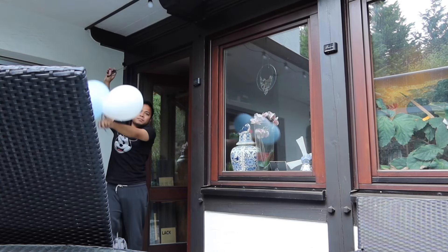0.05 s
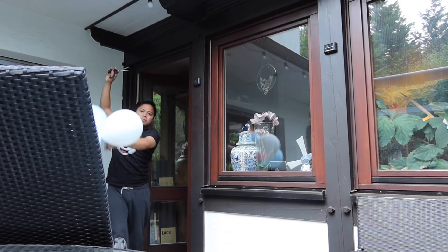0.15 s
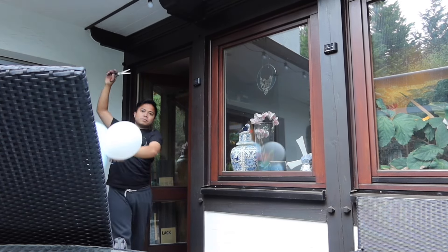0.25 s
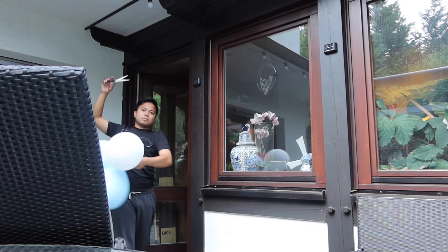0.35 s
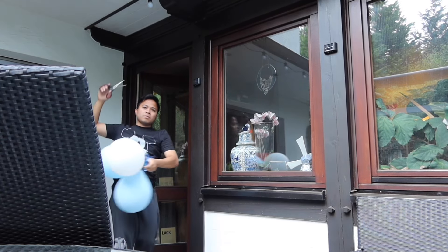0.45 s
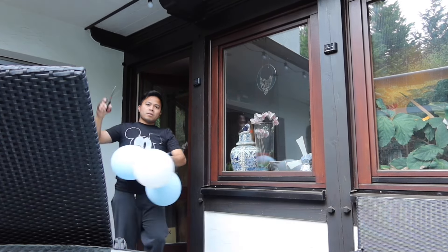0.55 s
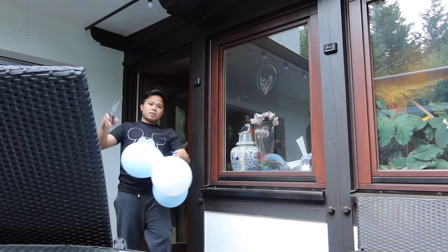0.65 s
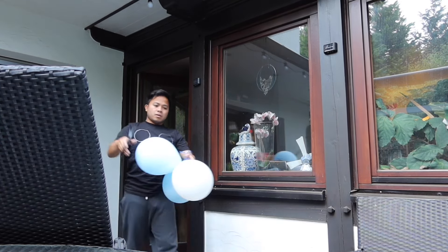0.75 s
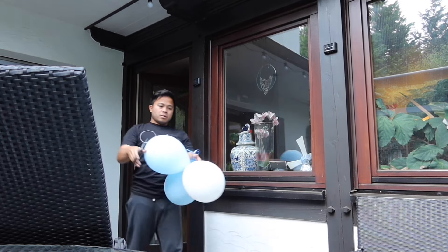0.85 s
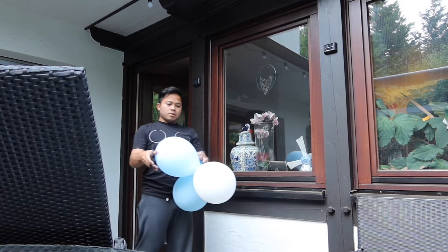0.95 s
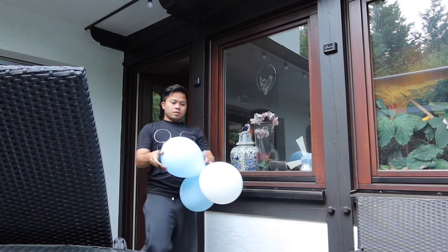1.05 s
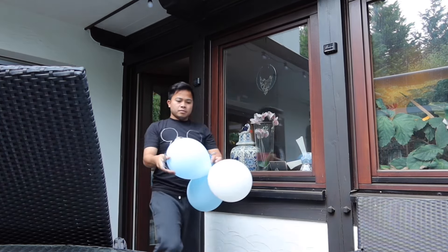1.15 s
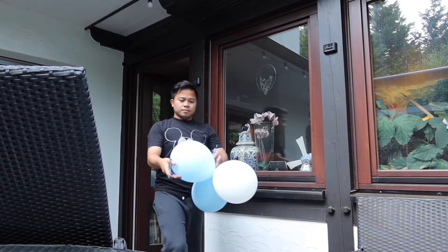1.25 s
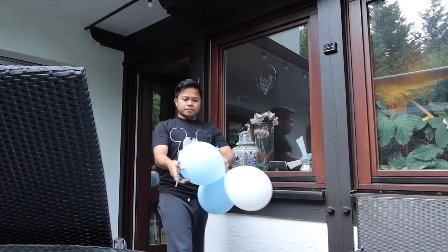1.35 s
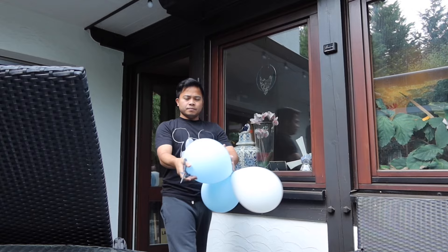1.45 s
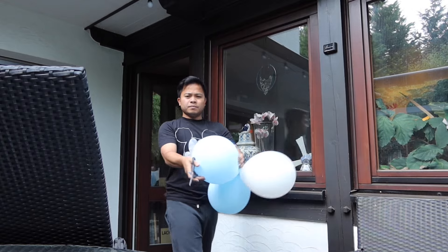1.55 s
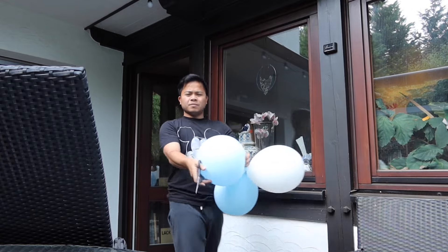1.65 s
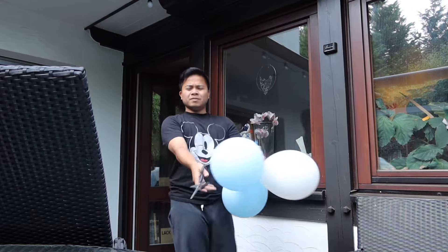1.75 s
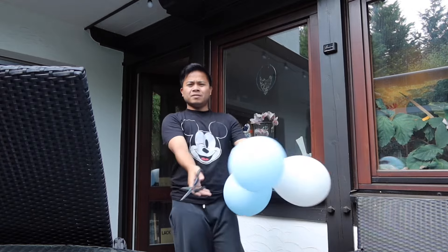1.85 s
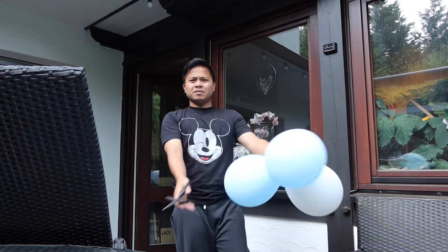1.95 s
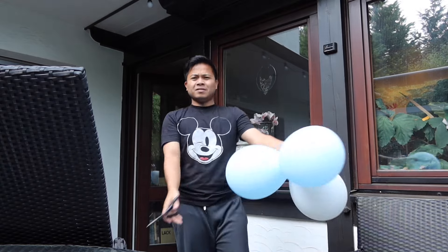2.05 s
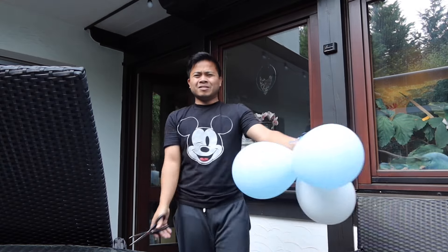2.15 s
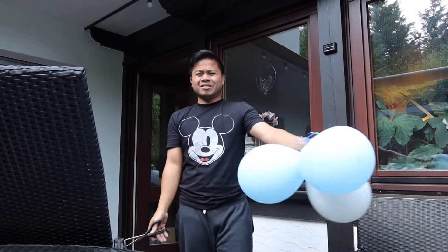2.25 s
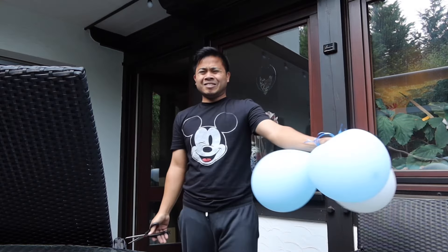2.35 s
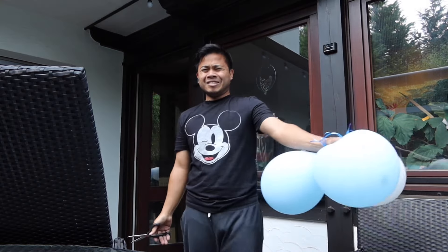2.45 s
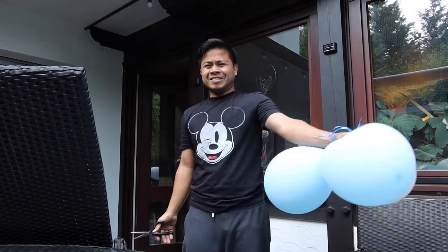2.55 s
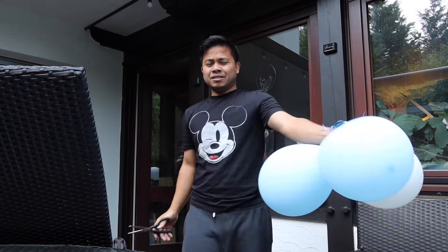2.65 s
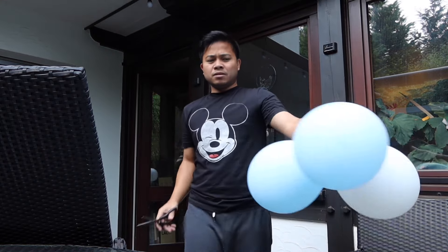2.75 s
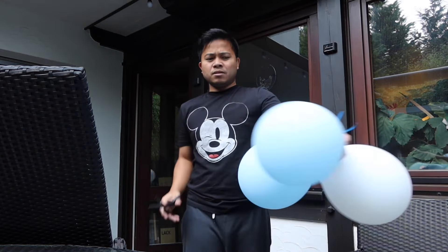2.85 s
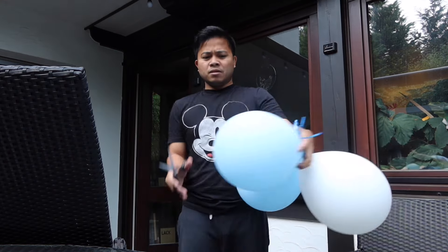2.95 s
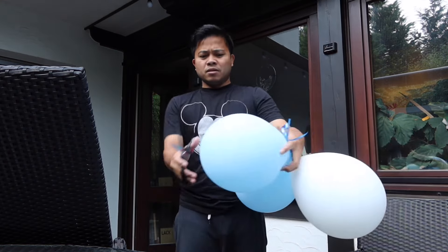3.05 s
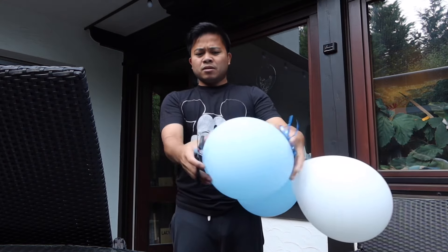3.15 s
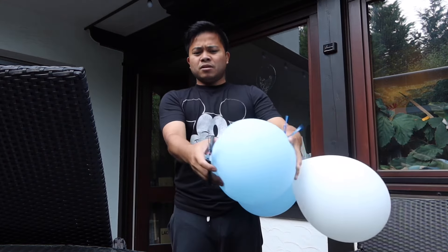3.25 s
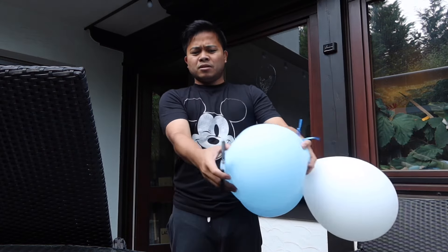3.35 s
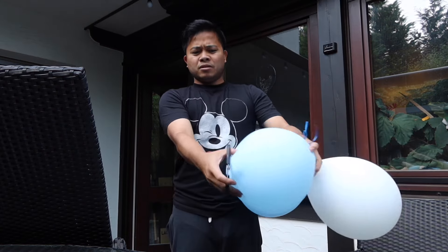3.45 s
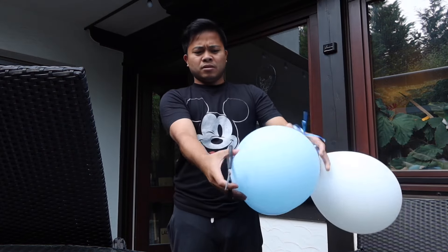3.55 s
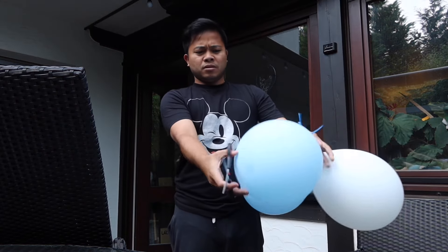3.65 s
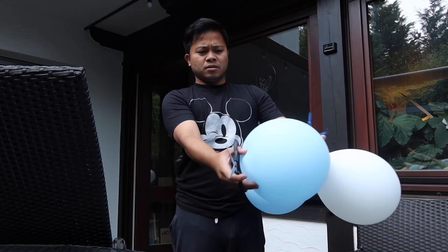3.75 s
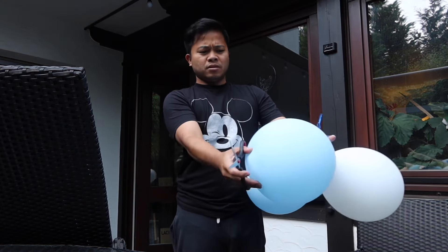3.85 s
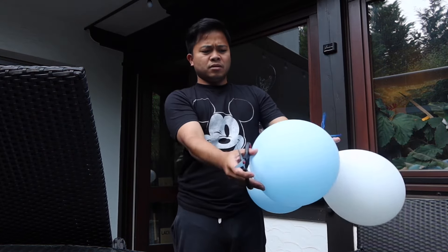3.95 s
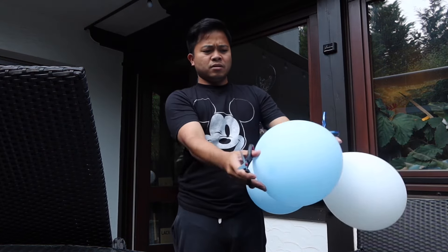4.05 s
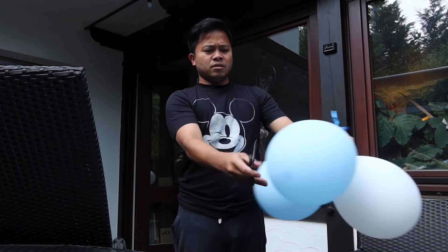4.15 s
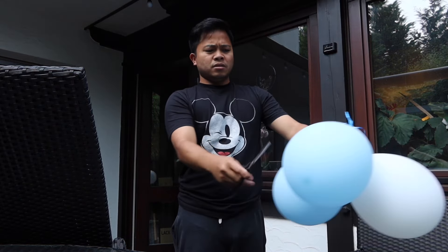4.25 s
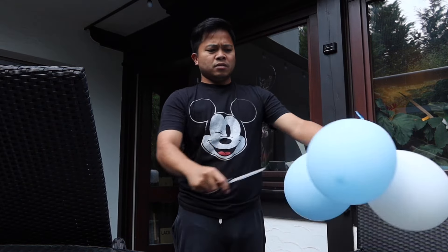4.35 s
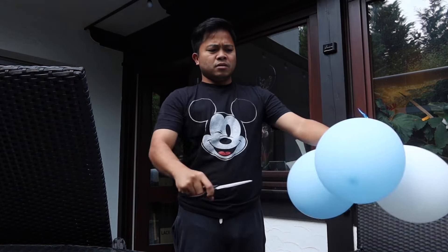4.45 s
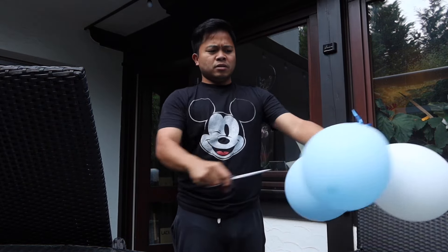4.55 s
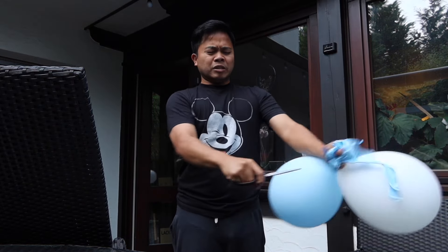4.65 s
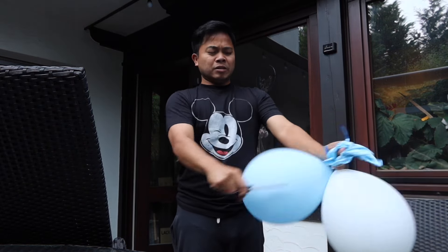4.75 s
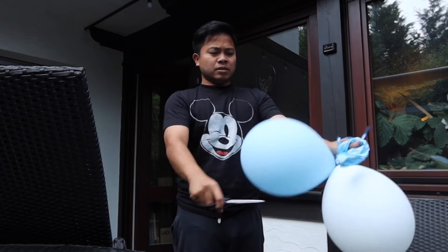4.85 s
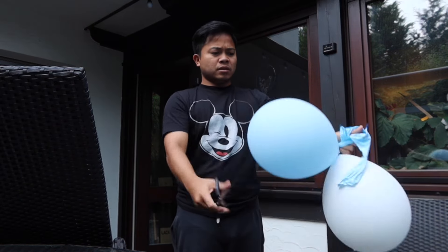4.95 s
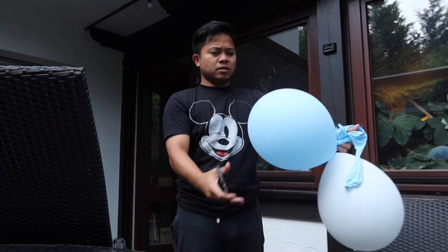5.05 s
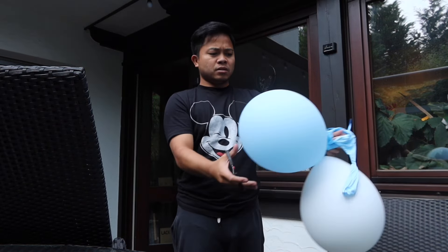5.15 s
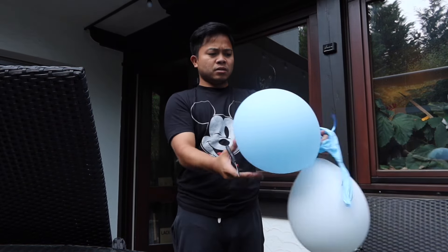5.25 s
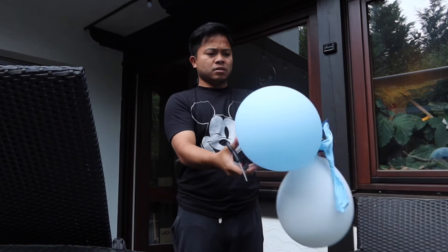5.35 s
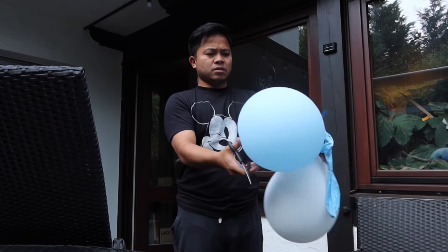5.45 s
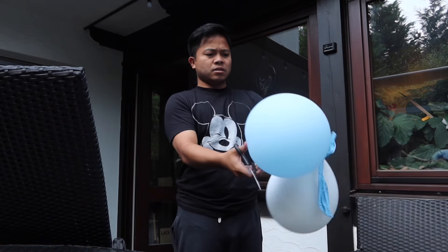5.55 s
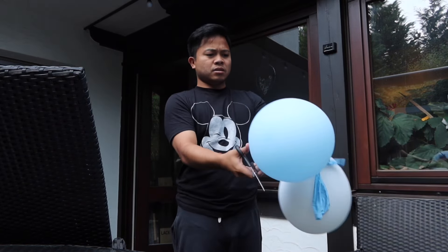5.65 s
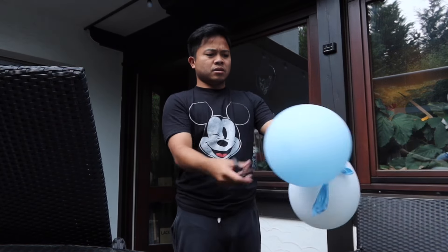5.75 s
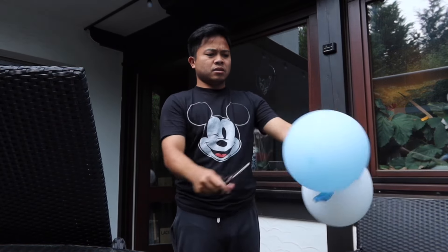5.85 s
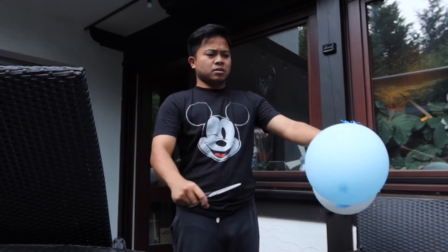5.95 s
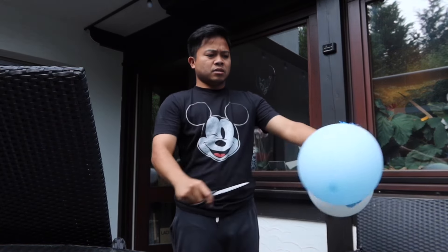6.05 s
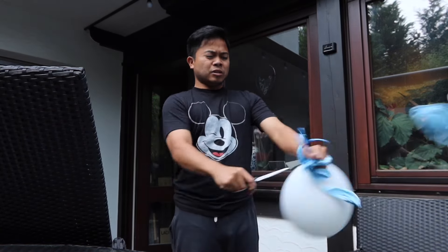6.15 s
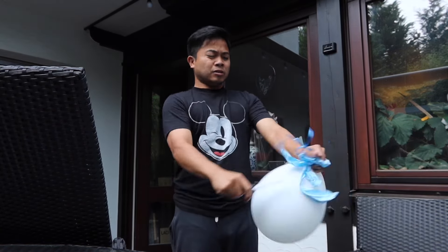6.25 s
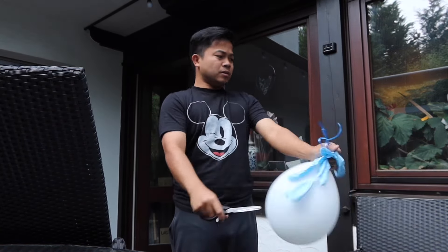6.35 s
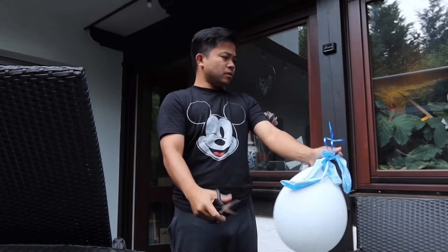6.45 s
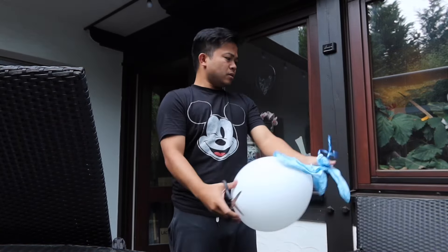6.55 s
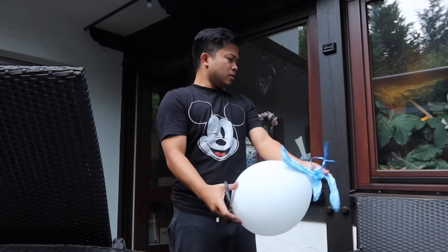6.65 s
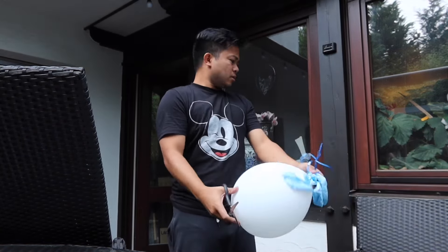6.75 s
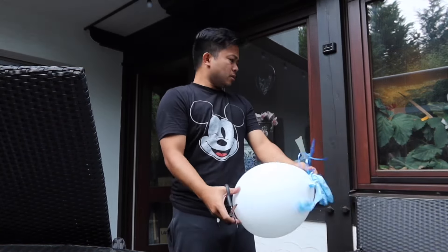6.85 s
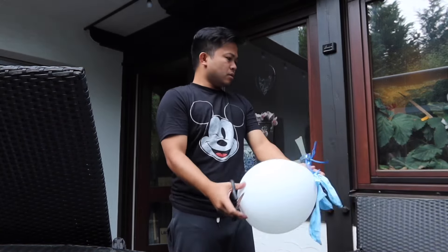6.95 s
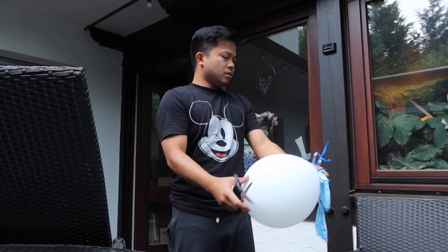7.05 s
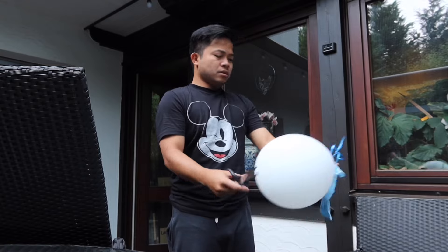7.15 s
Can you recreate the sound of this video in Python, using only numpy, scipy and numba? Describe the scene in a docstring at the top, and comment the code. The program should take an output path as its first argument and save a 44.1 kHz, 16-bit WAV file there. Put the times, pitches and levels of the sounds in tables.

```python
"""A low outdoor murmur runs throughout, under fingers rubbing and squeezing latex balloons on a porch.
Dense micro-slips make the rubbing; single hard slips crack and set the balloon's skin and air ringing.
Soft bumps thud, squeaks glide, creaks run slip after slip and palms hiss over the skin.
Two balloons are burst with scissors: filtered clicks, short swings, a wide dull noise and a yard echo.
They overload a small stereo recorder, whose limiter ducks and then lets the echo swell back."""
import sys
import numpy as np
from scipy import signal
from scipy.fft import rfft, irfft, next_fast_len
from scipy.io import wavfile
from scipy.ndimage import uniform_filter1d, minimum_filter1d
from numba import njit

SR = 44100
rng = np.random.default_rng(int(sys.argv[2]) if len(sys.argv) > 2 else 0)


def generate_wav(signal):
    """Clip the signal to [-1, 1] and save it as 16-bit WAV at the path in sys.argv[1]."""
    frames = np.transpose(np.atleast_2d(signal))
    scaled = np.clip(frames, -1, 1) * 32767
    pcm = np.round(scaled).astype(np.int16)
    wavfile.write(sys.argv[1], SR, pcm)


N = 317079
TIME = np.arange(N) / SR
SIZE = next_fast_len(N + SR)


def from_db(db):
    """Decibels to gain."""
    return 10 ** (np.asarray(db) / 20)


def rms_one(x):
    """Scale to unit rms."""
    return x / np.sqrt(np.mean(x ** 2) + 1e-20)


def at_hz(points, hz):
    """Read a table's second column against its first, on a log-frequency axis."""
    points = np.array(points)
    return np.interp(np.log(hz + 1), np.log(points[:, 0]), points[:, 1])


def high_pass(x, hz):
    """Take away the bass below hz, at 12 dB per octave."""
    return signal.sosfilt(signal.butter(2, hz, "high", fs=SR, output="sos"), x)


def colour(x, spectrum):
    """Causal (minimum-phase) filter with the given dB spectrum, so nothing sounds before a click."""
    size = 4096
    log_gain = np.log(from_db(at_hz(spectrum, np.fft.rfftfreq(size, 1 / SR))))
    cepstrum = irfft(log_gain)
    # folding the cepstrum forward gives minimum phase
    cepstrum[1:size // 2] *= 2
    cepstrum[size // 2 + 1:] = 0
    response = irfft(np.exp(rfft(cepstrum)))
    response = response.reshape((1,) * (x.ndim - 1) + (-1,))
    return signal.fftconvolve(x, response, axes=-1)[..., :N]


def clicks_at(times, sizes):
    """A train of single samples."""
    out = np.zeros(N)
    np.add.at(out, np.minimum((np.asarray(times) * SR).astype(int), N - 1), sizes)
    return out


def ring(clicks, hz, t60):
    """A two-pole resonator: a unit click sets a sine ringing that falls 60 dB in t60 seconds."""
    r, w = from_db(-60 / (t60 * SR)), 2 * np.pi * hz / SR
    return signal.lfilter([0, np.sin(w)], [1, -2 * r * np.cos(w), r * r], clicks + 1e-18)


@njit
def bending_ring(x, hz, width_hz, sr):
    """One resonance whose centre moves sample by sample."""
    out, r = np.zeros(len(x)), np.exp(-np.pi * width_hz / sr)
    for i in range(2, len(x)):
        drive = (1 - r * r) / 2 * (x[i] - x[i - 2])
        out[i] = drive + 2 * r * np.cos(2 * np.pi * hz[i] / sr) * out[i - 1] - r * r * out[i - 2]
    return out


def struck(notes, t60):
    """Damped sines, one for each (t/s, level/dB, f/Hz)."""
    out, t = np.zeros(N + SR), np.arange(int(min(2 * t60, 1) * SR)) / SR
    for s, db, hz in notes:
        out[int(s * SR):][:len(t)] -= from_db(db - 60 * t / t60) * np.sin(2 * np.pi * hz * t)
    return out[:N]


def closeness(hz, pitch, octaves, least):
    """Share of a touch that reaches a mode: most near the pitch the grip leaves free."""
    return np.maximum(np.exp(-(np.log2(hz / pitch) / octaves) ** 2), least)


# how alike reflections are left and right: [f/Hz, likeness 0-1]
REFLECTION_LIKENESS = [(100, 1), (500, 0.98), (2000, 1), (5000, 0.99)]


def echoes(x, t60_table, build_s):
    """Diffuse stereo reflections: noise whose octave bands die at their own rates; energy 1 per channel."""
    t = np.arange(SR) / SR
    tail = np.zeros((2, SR))
    # two takes of each noise alternate, so neighbouring bands are unrelated
    shared, own = rng.standard_normal((2, SR)), rng.standard_normal((2, 2, SR))
    for k, low in enumerate(40 * 2. ** np.arange(9)):
        centre = low * np.sqrt(2)
        alike = np.clip(at_hz(REFLECTION_LIKENESS, centre), 0, 1)
        band = signal.butter(2, [low, min(2 * low, .45 * SR)], "band", fs=SR, output="sos")
        noise = signal.sosfilt(band, np.sqrt(alike) * shared[k % 2] + np.sqrt(1 - alike) * own[k % 2])
        tail += noise * from_db(-60 * t / at_hz(t60_table, centre))
    tail *= 1 - np.exp(-t / build_s)
    tail /= np.sqrt(np.sum(tail ** 2) / 2)
    return signal.fftconvolve(x[None], tail, axes=-1)[:, :N]


# spectrum of the outdoor murmur: [f/Hz, relative level/dB per Hz]
GARDEN_SPECTRUM = [(20, -29), (50, 9.5), (100, 4), (250, 0.5), (600, -3.5), (950, -11.5), (2400, -14),
                   (4400, -22.5), (6000, -26), (9000, -32.5), (13000, -34), (15500, -63)]
# how alike the murmur is left and right: [f/Hz, likeness 0-1]
GARDEN_ALIKE = [(60, 1), (170, 0.89), (490, 0.53), (1390, 0.83), (3970, 0.67)]
GARDEN_DB, SWELL_DB = -45.5, 1.07   # level, and rms size of its slow drift


def garden():
    """Distant traffic, leaves and microphone hiss as one shaped noise, its stereo width set by pitch."""
    mid, side = rfft(rng.standard_normal((2, SIZE)))
    hz = np.fft.rfftfreq(SIZE, 1 / SR)
    alike = np.clip(at_hz(GARDEN_ALIKE, hz), 0, 1)
    pair = np.sqrt(1 + alike) * mid + np.sqrt(1 - alike) * side * [[1], [-1]]
    noise = rms_one(irfft(pair * from_db(at_hz(GARDEN_SPECTRUM, hz)), SIZE)[:, :N])
    swell = rms_one(signal.resample(rng.standard_normal(12), N))   # drifts about once a second
    return from_db(GARDEN_DB + SWELL_DB * swell) * noise


# finger strokes: [t/s, length/s, relative ring level at the start/dB, crack level re ring/dB,
# air note f/Hz, grip]
FINGER_STROKES = [(0.17, 0.27, -47.5, -4.5, 210, "holds"), (0.394, 0.19, -43, -11, 210, "holds"),
                  (0.611, 0.05, -43, -5, 307, "holds"), (0.717, 0.082, -43.5, -11, 360, "holds"),
                  (0.85, 0.077, -29, -7.5, 484, "eases"), (0.949, 0.23, -45.5, -10.5, 605, "holds"),
                  (1.097, 0.073, -29, -9, 726, "eases"), (1.196, 0.28, -30.5, -5, 670, "eases"),
                  (1.258, 0.059, -15.5, -5, 695, "eases"), (1.269, 0.23, -33, -4.5, 283, "eases"),
                  (1.477, 0.078, -28.5, -12.5, 392, "eases"), (1.548, 0.058, -29, -7.5, 255, "eases"),
                  (1.63, 0.069, -38.5, 7.5, 360, "eases"), (1.68, 0.077, -16, -7, 504, "holds"),
                  (1.721, 0.074, -15, -16, 342, "eases"), (2.148, 0.095, -48.5, -2, 583, "holds"),
                  (2.28, 0.17, -33, -7, 720, "eases"), (2.404, 0.036, -29, -10, 442, "eases"),
                  (2.511, 0.062, -31.5, -14, 440, "eases"), (2.575, 0.045, -23.5, -7, 610, "eases"),
                  (2.635, 0.053, -29.5, -7, 417, "holds"), (2.718, 0.063, -32.5, -5.5, 520, "tightens"),
                  (2.828, 0.061, -15.5, -11.5, 644, "eases"), (2.899, 0.18, -31, -8, 327, "holds"),
                  (3.093, 0.038, -27.5, -9, 730, "tightens"), (3.18, 0.081, -30, -12, 332, "holds"),
                  (3.298, 0.074, -31.5, -11.5, 350, "holds"), (3.428, 0.056, -12.5, -11, 584, "holds"),
                  (3.498, 0.079, -8.5, -12.5, 340, "eases"), (3.595, 0.032, -18, -6.5, 355, "holds"),
                  (3.638, 0.18, -27, -6.5, 430, "eases"), (3.847, 0.03, -14, -6.5, 326, "eases"),
                  (3.912, 0.03, -16, -24, 480, "eases"), (4.01, 0.085, -26.5, -9.5, 445, "tightens"),
                  (4.115, 0.045, -12.5, -6, 690, "holds"), (4.173, 0.034, -16, -3, 577, "eases"),
                  (4.198, 0.035, -14, -7.5, 594, "holds"), (4.234, 0.059, -25, 1, 725, "eases"),
                  (4.3167, 0.03, -10, -10, 497, "eases"), (4.966, 0.14, -33.5, -18, 336, "eases"),
                  (5.194, 0.068, -40.5, -9.5, 330, "holds"), (5.252, 0.11, -33.5, 0, 302, "eases"),
                  (5.314, 0.036, -12.5, -11, 558, "eases"), (5.348, 0.3, -44.5, -3.5, 557, "holds"),
                  (5.555, 0.051, -26, -13.5, 404, "tightens"), (5.642, 0.03, -14, -9, 596, "holds"),
                  (5.663, 0.11, -14, -4.5, 623, "eases"), (5.78, 0.11, -23.5, -8, 267, "holds"),
                  (5.845, 0.075, -28.5, -2, 710, "eases"), (6.384, 0.025, -18.5, -34, 450, "eases"),
                  (6.438, 0.17, -41.5, -19, 326, "holds"), (6.651, 0.059, -34, -13, 783, "holds"),
                  (6.727, 0.059, -29.5, -18.5, 455, "holds"), (6.822, 0.034, -22.5, -14.5, 483, "eases"),
                  (6.93, 0.097, -37, -4, 586, "eases"), (6.983, 0.054, -24.5, -16, 405, "holds"),
                  (7.033, 0.086, -26.5, -7, 690, "holds"), (7.119, 0.053, -30.5, -21, 335, "tightens")]
# change over a stroke: grip -> [level/dB]
GRIP_CHANGE = {"tightens": 9, "holds": 2.5, "eases": -16.5}
FINE_DB, FINE_FOLLOWS = -18.5, 1   # fine treble re ring, plus this share of the crack's dB re ring
GRIP_S = 0.00034   # time the fingers take to grip


def stroke_gains(fade_db_s):
    """A stroke grips at once, swells or eases with the grip, and fades after the fingers let go."""
    levels = np.full((3, N), -120.)
    for start, length, ring_db, crack_db, _, grip in FINGER_STROKES:
        on = slice(int(start * SR), int((start + length) * SR))
        layers_db = ring_db + np.array([[0], [crack_db], [FINE_DB + FINE_FOLLOWS * crack_db]])
        levels[:, on] = layers_db + GRIP_CHANGE[grip] * (TIME[on] - start) / length
    # the level may fall no faster than fade_db_s
    gains = from_db(np.maximum.accumulate(levels + fade_db_s * TIME, axis=1) - fade_db_s * TIME)
    r = np.exp(-1 / (GRIP_S * SR))
    return signal.lfilter([1 - r], [1, -r], gains)


# modes of the balloon's skin and air: [f/Hz, relative level/dB, t60/s]
BALLOON_MODES = [(202, -8.5, 0.044), (279, -1, 0.081), (342.7, -3, 0.074), (400.4, -4, 0.069),
                 (481, 0.5, 0.046), (552, 2.5, 0.042), (616.3, 5.5, 0.04), (688.5, 10, 0.02),
                 (915, 3.5, 0.025), (1088, -1, 0.03), (1252, -6, 0.056), (1663, -5.5, 0.043),
                 (1960, 0, 0.033), (2110, -2.5, 0.02), (2530, -6.5, 0.03), (3030, -44, 0.029)]
# spectrum of a slip's crack: [f/Hz, level/dB]
CRACK_SPECTRUM = [(150, -115), (800, 3), (1400, 12.5), (2000, 10.5), (2700, 9), (3500, 8.5), (4500, 3),
                  (6000, -8), (16000, -90.5)]
# spectrum of the fine treble: [f/Hz, level/dB]
FINE_SPECTRUM = [(1500, -23), (5000, 9), (7500, 10.5), (12500, 7.5), (14500, -7), (17000, 6)]
# taut patches of skin, retuned by every stroke
PATCH_HZ, PATCH_SPREAD, PATCH_WIDTH_HZ, PATCH_DB = (1250, 2150, 2850), .08, 500., 5
FLUTTER_DB = 2.0   # rms waver of the finger pressure, up to some 30 times a second


def rubbing(per_s, uneven_db, hiss):
    """Dense uneven micro-slips under the fingers feed ring, crack and fine treble together."""
    ring_gain, crack_gain, fine_gain = stroke_gains(fade_db_s=502.0)
    start, length, _, _, note = np.transpose([row[:-1] for row in FINGER_STROKES])
    pitch = np.interp(TIME, start + length / 2, note)

    # the skin always springs back the same way, so all slips share a sign
    sizes = -from_db(uneven_db * np.minimum(rng.exponential(1, N), 3))
    impulses = rms_one(sizes * (rng.random(N) < per_s / SR))
    slips = rms_one(impulses + hiss * rng.standard_normal(N))
    slips *= from_db(FLUTTER_DB * rms_one(signal.resample(rng.standard_normal(N // 735), N)))

    # each slip lands elsewhere, so every mode gets its own changing share
    spread = rng.standard_normal((len(BALLOON_MODES), N // 64 + 1)).repeat(64, axis=1)[:, :N]
    push = ring_gain * slips
    body = sum(from_db(db - 32.5) * ring(push * w * closeness(hz, pitch, 0.31, 0.63), hz, t60)
               for w, (hz, db, t60) in zip(spread, BALLOON_MODES))
    # squeezing bends the gripped balloon's air note
    body += from_db(9.5) * bending_ring(push, pitch, 35.0, SR)

    tuning = np.exp(PATCH_SPREAD * rng.standard_normal((len(FINGER_STROKES), len(PATCH_HZ))))
    stroke_now = np.maximum(np.searchsorted(start, TIME) - 1, 0)
    patches = sum(bending_ring(slips, hz * tuned[stroke_now], PATCH_WIDTH_HZ, SR)
                  for hz, tuned in zip(PATCH_HZ, tuning.T))
    crack = rms_one(colour(slips + from_db(PATCH_DB) * patches, CRACK_SPECTRUM))
    fine = rms_one(colour(slips + 0.8 * rng.standard_normal(N), FINE_SPECTRUM))
    return body + crack_gain * crack + fine_gain * fine


# decay of the porch's reflections: [f/Hz, t60/s]
PORCH_DECAY = [(60, 0.67), (300, 0.16), (1000, 0.26), (4000, 0.31), (12000, 0.14)]
PORCH_DB = -11.5   # echo re direct sound


def porch(hands):
    """The porch answers the hands with quickly dying diffuse reflections."""
    return from_db(PORCH_DB) * echoes(hands, PORCH_DECAY, build_s=0.0039)


# soft bumps of balloon on balloon: [t/s, level/dB, f/Hz]
SOFT_BUMPS = [(0.189, -37, 154.6), (0.477, -31.5, 82), (0.552, -38, 119), (0.775, -34.5, 161),
              (1.708, -22.5, 104), (2.781, -25, 72.5), (3.449, -20, 85.5), (3.56, -26, 62.5),
              (4.13, -23.5, 127), (5.331, -31.5, 102), (6.578, -25.5, 79.4), (6.598, -30.5, 57.5)]


def bumps(t60):
    """Soft contacts give a low thud of three skin modes."""
    return struck([(s, db, hz * ratio) for s, db, hz in SOFT_BUMPS for ratio in (1, 1.4, 2.3)], t60)


# squeaks: [start t/s, end t/s, level/dB, first f/Hz, last f/Hz,
# level from one overtone to the next/dB]
SQUEAK_TONES = [(1.2, 1.24, -36.5, 1308, 1320, -19), (1.262, 1.278, -20.5, 1090, 1120, -22),
                (1.681, 1.699, -21, 625, 602, 0.5), (3.12, 3.144, -25, 1330, 1435, -7),
                (3.181, 3.191, -22.5, 960, 1010, -13), (3.58, 3.682, -22, 330, 552, -3.5),
                (3.587, 3.594, -13.5, 2760, 2720, -32), (4.12, 4.173, -18, 2175, 2160, -18),
                (4.2, 4.25, -20, 1600, 1606, -25), (4.205, 4.251, -17, 2170, 2170, -25),
                (6.66, 6.703, -35, 460, 1080, -7.5)]


def squeaks(wobble):
    """Regular stick-slip gives a gliding, wavering tone with overtones."""
    out = np.zeros(N)
    for start, end, db, first_hz, last_hz, overtone_db in SQUEAK_TONES:
        on = slice(int(start * SR), int(end * SR))
        share = (TIME[on] - start) / (end - start)
        shaky = rms_one(uniform_filter1d(rng.standard_normal(N // 10), size=150))[:len(share)]
        hz = first_hz * (last_hz / first_hz) ** share * (1 + wobble * shaky)
        phase = 2 * np.pi * np.cumsum(hz) / SR
        tone = sum(from_db(overtone_db * k) * np.sin((k + 1) * phase + k * k) for k in range(6))
        out[on] += from_db(db) * np.sqrt(np.abs(np.sin(np.pi * share))) * tone
    return out


# single hard slips: [t/s, relative crack level/dB, relative ring level/dB, ring centre f/Hz]
HARD_SLIPS = [(1.2628, -11, -23, 674), (1.4774, -22.5, -33.5, 710), (1.552, -27, -26, 345),
              (1.7157, -6.5, -8, 340), (2.576, -34, -41, 455), (2.6363, -14, -23.5, 420),
              (2.6755, -17, -28, 400), (2.7688, -15, -10, 576), (2.8287, -5.5, -8.5, 664),
              (2.8458, -5, -27, 620), (2.8996, -10.5, -20, 610), (2.9376, -7, -17, 382),
              (2.9627, -16, -20.5, 364), (2.9876, -13.5, -17, 350), (3.0239, -12, -14.5, 350),
              (3.0451, -15, -25, 378), (3.0626, -17, -16.5, 396), (3.192, -2, -7, 322),
              (3.3867, -11.5, -30, 322), (3.4472, -3.5, -1.5, 580), (3.637, -11, -12.5, 484),
              (3.5895, -6, -15, 342), (3.837, -17, -27, 750), (4.0063, -18, -28, 474),
              (4.023, -11.5, -22.5, 453), (4.1875, -5.5, -16, 572), (4.2016, -13, -12, 570),
              (4.2082, -0.5, -11, 540), (4.3113, -0.5, -12, 635), (5.1607, -28.5, -45, 328),
              (5.3164, -11, -20.5, 288), (5.4954, -22, -34.5, 502), (5.585, -14, -11.5, 446),
              (5.6868, -7, -13, 467), (5.7572, -14.5, -22, 600), (5.777, -18, -30, 613),
              (5.798, -10.5, -31, 395), (5.8516, -12, -21.5, 641), (5.917, -14.5, -34, 243),
              (6.381, -13.5, -22, 475), (6.821, -23.5, -24, 503), (7.1668, -6.5, -9, 326)]
HARD_IS_BRIGHT = 1.58   # dB of fine treble for each dB of a slip's crack
# the freed patch of skin twangs briefly, each at a pitch of its own; level re crack
SNAP_HZ, SNAP_SPREAD, SNAP_T60_S, SNAP_DB = 2900, .1, .0055, -1
SOFT_HZ, FINE_FROM_HZ = 4300, 6500   # rubber dulls the crack above the first; fine treble starts at the second


def hard_slips(fine_db, ring_db, rattle_db, rattle_s):
    """Each slip cracks, leaves a dying rattle of the skin, and rings mostly the modes near its own pitch."""
    s, crack_db, body_db, pitch = np.transpose(HARD_SLIPS + creak_slips())
    luck = rng.normal(0, 3, (len(s), len(BALLOON_MODES)))   # dB, per slip and mode
    snaps = clicks_at(s, -from_db(crack_db))
    snap_hz = SNAP_HZ * np.exp(SNAP_SPREAD * rng.standard_normal(len(s)))
    twang = struck(zip(s, crack_db + SNAP_DB, snap_hz), SNAP_T60_S)
    rattle_fade = signal.lfilter([1], [1, -np.exp(-1 / (rattle_s * SR))], snaps + 1e-18)
    rattle = rattle_fade * rng.standard_normal(N)

    soft = signal.butter(2, SOFT_HZ, fs=SR, output="sos")
    snaps = signal.sosfilt(soft, snaps + from_db(rattle_db) * rattle)
    twang = signal.sosfilt(np.vstack([soft, soft]), twang)
    fine = high_pass(clicks_at(s, -from_db(fine_db + HARD_IS_BRIGHT * crack_db)), FINE_FROM_HZ)
    out = twang + colour(snaps, CRACK_SPECTRUM) + colour(fine, FINE_SPECTRUM)

    out += struck(zip(s, body_db, pitch), t60=0.03)   # the air note of the gripped balloon
    for k, (hz, db, t60) in enumerate(BALLOON_MODES):
        touch = closeness(hz, pitch, 0.04, 0.13) * from_db(body_db + db + ring_db + luck[:, k])
        out += ring(clicks_at(s, -touch), hz, t60)
    return out


# palm slides: [t/s, length/s, level/dB]
PALM_SLIDES = [(2.717, 0.082, -41.5), (3.428, 0.03, -30.5), (3.639, 0.046, -41.5), (5.244, 0.07, -43.5),
               (5.708, 0.24, -44.5)]


def slides():
    """A palm slides over the skin: thin smooth treble noise that swells and dies."""
    gain = sum(from_db(db) * np.sqrt(np.sin(np.pi * np.clip((TIME - s) / length, 0, 1)) ** 2)
               for s, length, db in PALM_SLIDES)
    return gain * rms_one(colour(rng.standard_normal(N), FINE_SPECTRUM))


# creaks, runs of slips: [t/s, slips, first gap/s, last gap/s, relative crack level/dB,
# relative ring level/dB, f/Hz]
CREAK_RUNS = [(3.4141, 6, 0.011, 0.0095, 0, -14, 800), (3.503, 2, .0095, .0095, -18, -7.5, 420),
              (3.573, 3, 0.0046, 0.0032, -12.5, -19.5, 603), (3.8479, 3, 0.0065, 0.0063, -12, -15, 430),
              (3.9056, 3, 0.011, 0.016, -2, -17.5, 517), (4.0396, 11, 0.0042, 0.0067, -5.5, -17, 437),
              (4.1041, 5, 0.0068, 0.011, -2, -22.5, 484), (5.628, 6, 0.0068, 0.0056, -6, -17, 398),
              (7.0474, 3, 0.0035, 0.0028, -13, -28, 596)]
CREAK_FADE_DB = -1.5   # from one slip to the next


def creak_slips():
    """Each creak as rows of single slips: the gaps change by a steady ratio, the slips weaken."""
    rows = []
    for start, slips, first, last, crack_db, ring_db, pitch in CREAK_RUNS:
        times = start + np.cumsum([0, *np.geomspace(first, last, round(slips) - 1)])
        for k, s in enumerate(times):
            fade_db = CREAK_FADE_DB * k
            rows.append((s, crack_db + fade_db, ring_db + fade_db, pitch))
    return rows


# bursts: [t/s, relative level/dB, ring of the escaping air f/Hz]
BALLOON_BURSTS = [(4.6273, 21.5, 592), (6.1346, 22, 577)]
# spectrum of the blast: [f/Hz, level/dB]
BLAST_SPECTRUM = [(30, -104), (90, -8), (250, 3), (600, 4.5), (1000, -9.5), (2500, -12), (5000, -19),
                  (12000, -18.5), (16000, -56)]
# separate wall echoes of a burst: [delay t/s, level re swing/dB]
WALL_ECHOES = [(.0183, -8), (.0242, -13), (.029, -15)]
# decay of the yard's reflections: [f/Hz, t60/s]
YARD_DECAY = [(60, 0.73), (400, 0.48), (2000, 0.58), (5000, 0.37), (12000, 0.36)]
YARD_DB, YARD_CUT_HZ = 16.5, 4000   # yard echo level; it and the wide noise are dull above the cut
WIDE_DB, WIDE_S = 9, 0.0048   # a short dull noise at each pop, opposite in the two overloaded channels


def bursts(t60):
    """The freed air cracks, swings a few times, slaps back from near walls and echoes round the yard."""
    s, db, pitch = np.transpose(BALLOON_BURSTS)
    blast = colour(clicks_at(s, from_db(db)), BLAST_SPECTRUM)
    swing = struck(zip(s + 0.00046, db, pitch), t60)
    swing += struck([(s + lag, db + loss_db, hz) for s, db, hz in BALLOON_BURSTS
                     for lag, loss_db in WALL_ECHOES], t60)
    noise_fade = signal.lfilter([1], [1, -np.exp(-1 / (WIDE_S * SR))], clicks_at(s, 0.59) + 1e-18)
    noise = noise_fade * rms_one(colour(rng.standard_normal(N), BLAST_SPECTRUM))

    dull = signal.butter(2, YARD_CUT_HZ, fs=SR, output="sos")
    wide = from_db(WIDE_DB) * high_pass(signal.sosfilt(dull, noise), 350)
    direct = high_pass(from_db(11.0) * blast + swing, 276) + wide * [[1], [-1]]
    yard = echoes(signal.sosfilt(dull, blast), YARD_DECAY, build_s=0.0005)
    return direct + from_db(YARD_DB) * yard


# side signal of the recorder's stereo processing: [f/Hz, side level re mid/dB, phase the side leads/rad]
SIDE_RESPONSE = [(250, -65, -0.07), (554, -16, 0.5), (1070, -26.5, 1.4), (1690, -35, -2.7),
                 (2800, -22.5, -2), (4300, -0.5, -1.64), (8000, -0.5, -1.63), (12000, 1, -1.6)]


def stereo_processing(x):
    """The recorder's stereo processing adds a side signal to hands, bursts and echoes, set by pitch."""
    hz, response = np.fft.rfftfreq(SIZE, 1 / SR), np.array(SIDE_RESPONSE)
    gain = from_db(at_hz(response, hz)) * np.exp(1j * at_hz(response[:, ::2], hz))
    side = irfft(gain * rfft(x.mean(axis=0), SIZE), SIZE)[:N]
    return x + side * [[1], [-1]]


def scene():
    """Hands on balloons in the porch, two bursts, garden behind."""
    rubber = rubbing(per_s=700., uneven_db=2.0, hiss=0.57)
    rubber += hard_slips(fine_db=-13.5, ring_db=-2.5, rattle_db=-19.0, rattle_s=0.0046) + slides()
    rubber += squeaks(wobble=0.02)
    hands = high_pass(rubber, 125) + bumps(t60=0.12)
    near = hands + porch(hands)
    return stereo_processing(near + bursts(t60=0.0087)) + garden()


LIMIT_DB, ATTACK_S, RELEASE_DB_S = -0.5, 0.01, 235
CUTOFF_HZ = 16500


def record(dry):
    """A limiter reacts a little late, holds, and recovers at a steady rate; the overshoot clips; the top is cut."""
    over = np.maximum(20 * np.log10(np.abs(dry).max(axis=0) + 1e-9) - LIMIT_DB, 0)
    over = -minimum_filter1d(-over, size=1323, origin=661)   # each peak is held for 30 ms
    held = np.maximum.accumulate(over + RELEASE_DB_S * TIME) - RELEASE_DB_S * TIME
    r = np.exp(-1 / (max(ATTACK_S, 1e-4) * SR))
    limited = dry * from_db(-signal.lfilter([1 - r], [1, -r], held))
    limited = high_pass(np.clip(limited, -.97, .97), 43.6)
    return signal.sosfilt(signal.cheby2(10, 60, CUTOFF_HZ, fs=SR, output="sos"), limited)


dry = scene()
out = record(dry)
generate_wav(out)
```